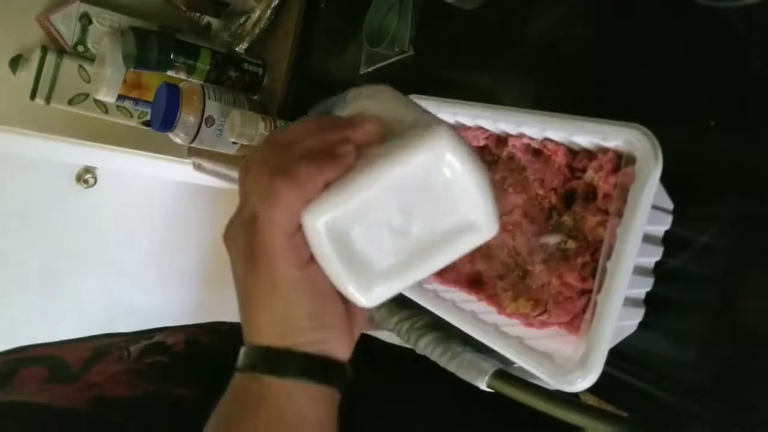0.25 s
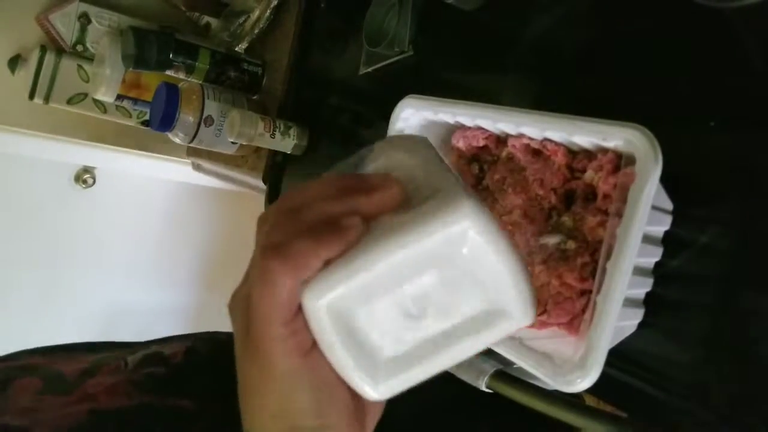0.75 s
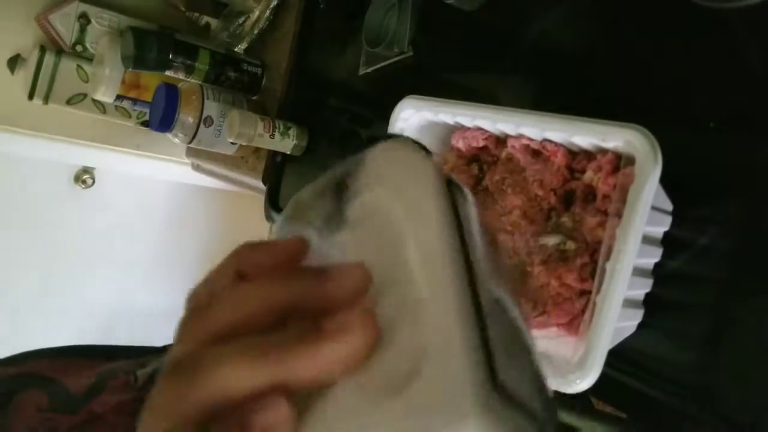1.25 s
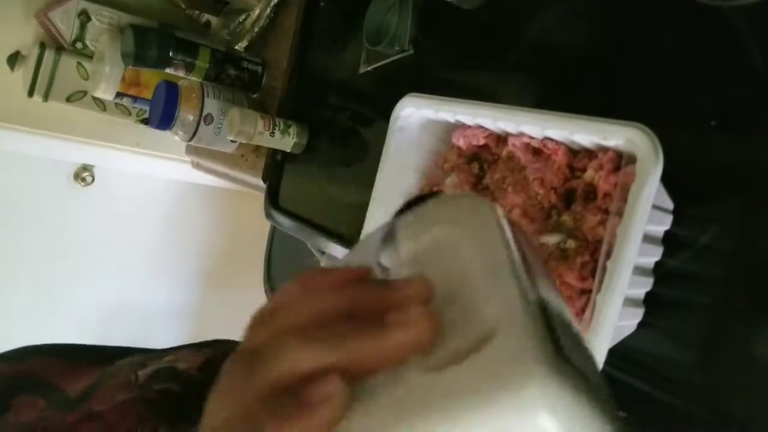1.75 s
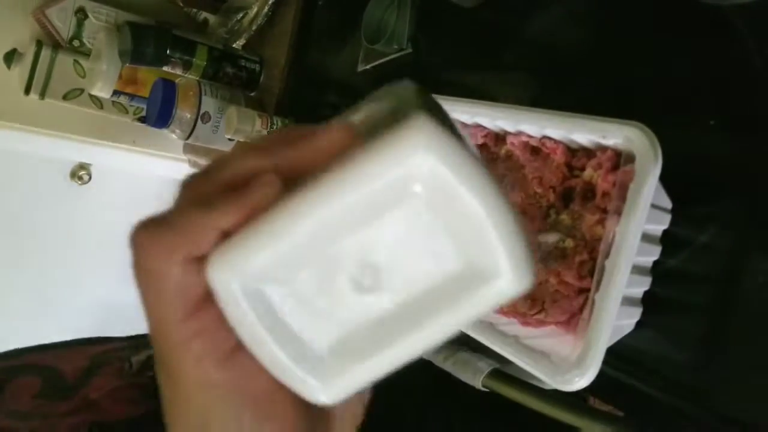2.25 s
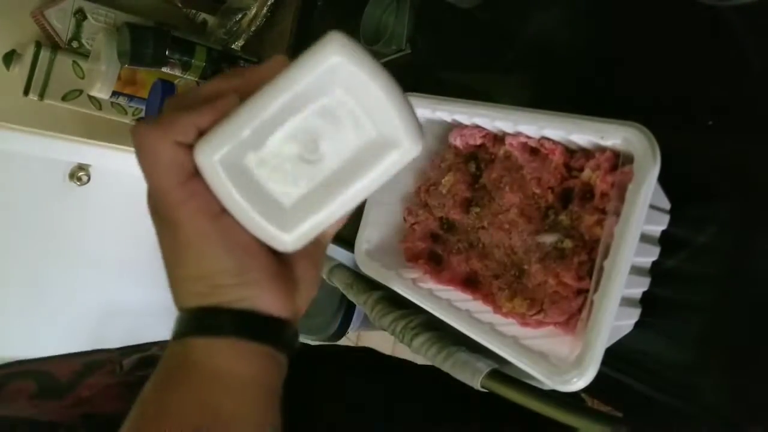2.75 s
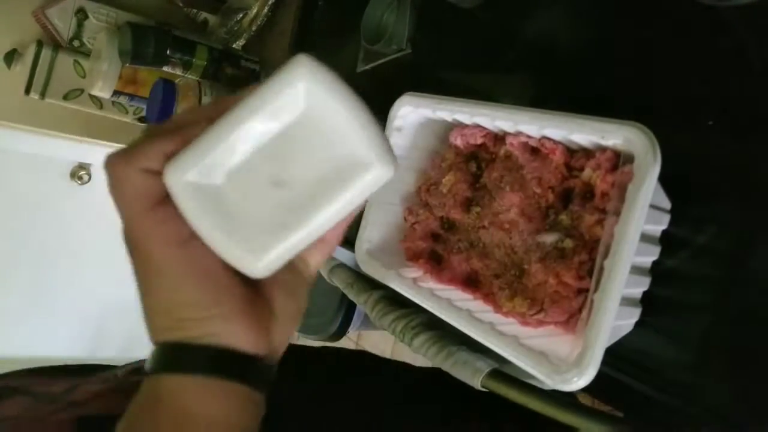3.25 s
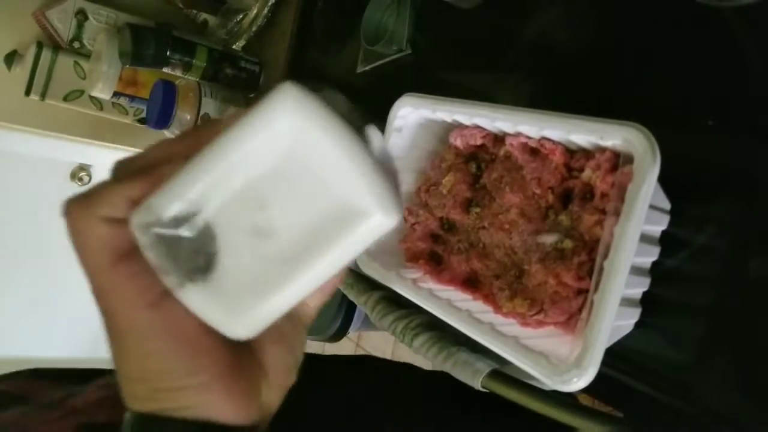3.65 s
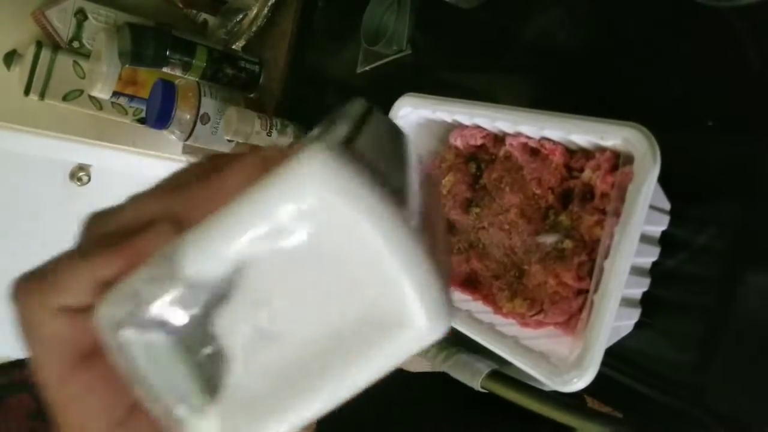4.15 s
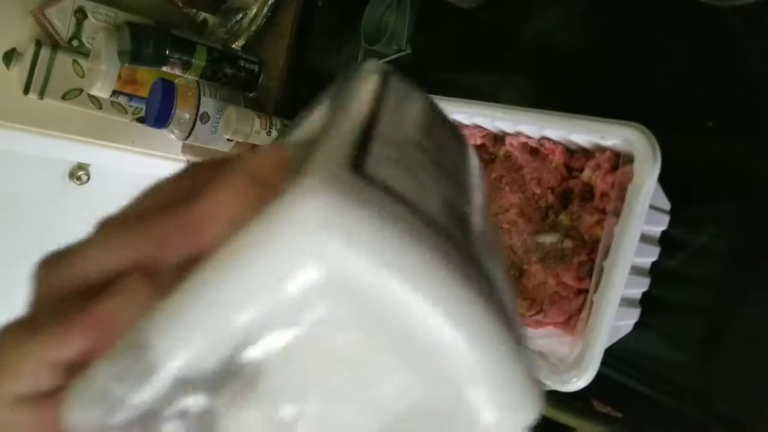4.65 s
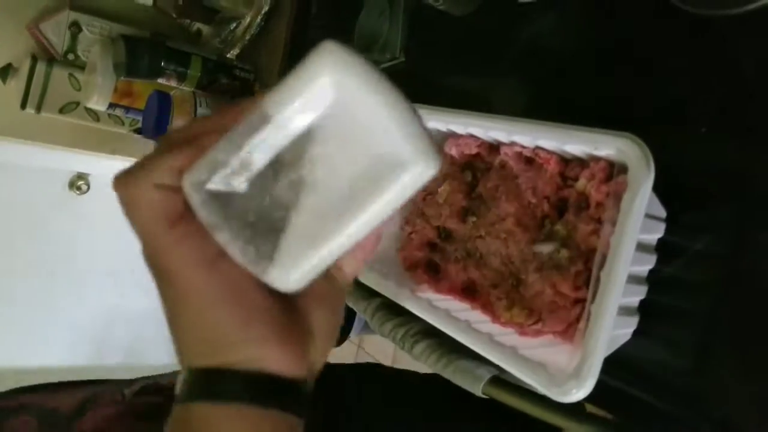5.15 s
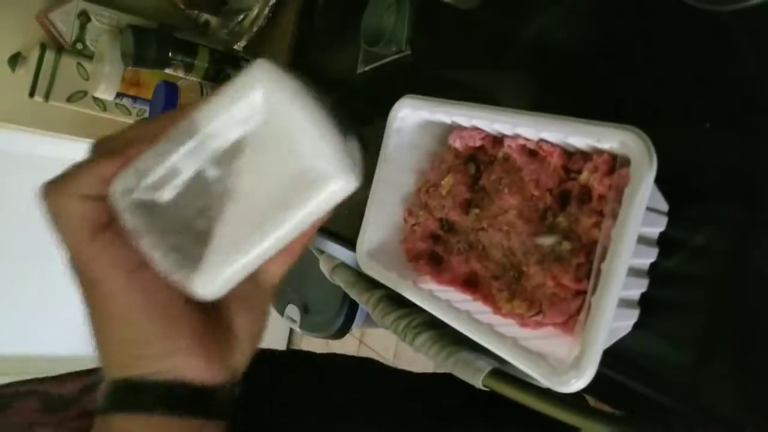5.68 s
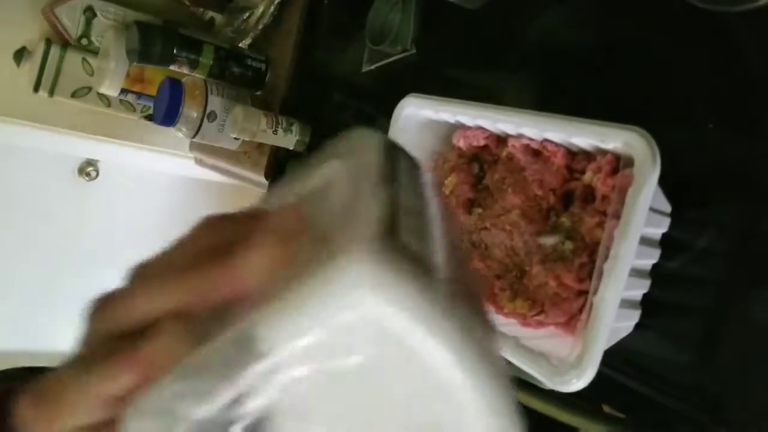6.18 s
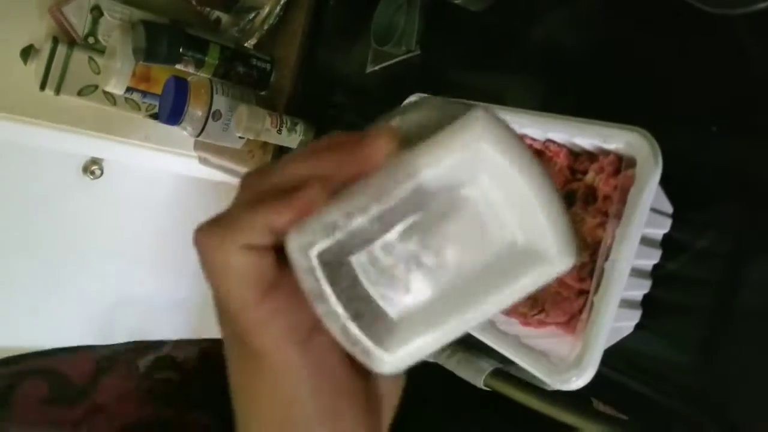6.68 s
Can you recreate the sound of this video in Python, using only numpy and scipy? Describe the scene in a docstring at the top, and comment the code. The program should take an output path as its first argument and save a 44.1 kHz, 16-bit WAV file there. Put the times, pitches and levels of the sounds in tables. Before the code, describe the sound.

Salt hisses and rattles in a hand-shaken plastic jar in uneven strokes, lumps knocking its wall harder later, over faint kitchen appliance hum.

```python
"""A plastic jar of salt is shaken in uneven strokes in a small kitchen.
Loose grains hiss as coloured random ticks; coarser grains scrape the wall and set its resonances ringing.
Lumps knock amid bursts of crumbs and throw off sprays; one brief puff of noise sounds around 3 kHz.
Soft handling bumps are low sine bursts, and a short noise-built room response surrounds the jar.
An appliance hums as wavering sines under the low rumble of the room, which is shaped noise."""
import sys
import numpy as np
from scipy import signal
from scipy.fft import rfft, irfft, next_fast_len
from scipy.io import wavfile
from scipy.ndimage import uniform_filter1d

SR = 44100
rng = np.random.default_rng(int(sys.argv[2]) if len(sys.argv) > 2 else 0)


def wrap_up_sound(samples):
    """Save the sound to the file named by the first command line argument, as 16-bit audio."""
    columns = np.atleast_2d(samples).T
    # keep every value between -1 and 1, then stretch to whole-number steps
    tamed = np.clip(columns, -1, 1)
    steps = np.round(tamed * 32767).astype(np.int16)
    wavfile.write(sys.argv[1], SR, steps)


N = 305039
TIME = np.arange(N) / SR
SIDES = np.array([[1], [-1]])  # left plus, right minus

# slides of the salt along the wall, levels before each layer's trim:
# start_s, rise_s [s], hold_s [s], hiss_db [dB], wall_ring_db [dB]
SLIDES = [(0.0, 0.0046, 0.14, -65, -72), (0.067, .07, 0.14, -60, -56), (0.311, 0.055, 0.047, -51.5, -51),
          (0.479, .02, 0.026, -54, -58), (0.56, 0.023, .1, -63.5, -70), (0.87, .01, 0.066, -74, -53.5),
          (0.973, 0.023, 0.048, -62, -70), (1.043, 0.031, 0.053, -60.5, -52.5),
          (1.378, 0.018, 0.094, -53.5, -55), (1.553, 0.018, 0.024, -59, -57),
          (1.748, 0.026, 0.11, -54.5, -49), (1.922, 0.038, 0.069, -64.5, -57),
          (2.072, 0.062, 0.056, -59, -52.5), (2.47, 0.066, .012, -61.5, -60),
          (2.565, 0.19, 0.074, -59.5, -60), (2.87, 0.055, 0.14, -56, -51.5), (3.233, 0.12, 0.02, -63, -64),
          (3.446, 0.068, 0.04, -59, -43.5), (3.635, 0.0057, .14, -55, -43.5), (3.853, .03, .08, -74, -57),
          (3.973, 0.06, 0.1, -55.5, -44), (4.293, 0.0045, 0.0082, -62.5, -56),
          (4.371, 0.03, 0.021, -54.5, -54), (4.424, 0.033, 0.029, -50.5, -48),
          (4.576, 0.018, 0.046, -69, -70), (4.738, 0.05, 0.081, -53, -44),
          (5.111, 0.042, 0.024, -58, -50.5), (5.456, 0.0038, 0.0055, -58, -59),
          (5.493, 0.02, 0.01, -58, -49), (5.535, 0.06, .012, -53, -46.5), (5.686, 0.018, 0.065, -61, -54),
          (5.725, 0.19, 0.066, -59.5, -48.5), (6.206, 0.026, .06, -53, -48),
          (6.282, 0.044, 0.012, -51, -54), (6.559, 0.029, 0.04, -55, -58),
          (6.647, 0.035, 0.052, -52.5, -43.5)]
# lumps hitting the jar, levels before each layer's trim: time_s, knock_db of the upper modes,
# thud_db of the middle modes, thump_db of the lowest modes, spray_db of grains, favoured_hz
LUMPS = [(0.2395, -48, -64, -63, -49.5, 487), (0.3458, -43, -59, -67, -62, 2360),
         (0.5066, -42, -64, -58, -46, 1760), (0.632, -47, -51.5, -49, -57, 890),
         (0.7307, -58, -57, -60, -58, 700), (1.0193, -47.5, -57, -42, -64, 1410),
         (1.074, -35.5, -51, -55, -50, 2310), (1.4265, -37, -46, -55, -55, 2220),
         (1.497, -40, -46, -63, -47.5, 2220), (1.9195, -50, -57, -51, -53, 649),
         (2.4059, -49.5, -53, -51, -63, 900), (2.854, -43, -52, -47, -69, 1370),
         (2.9077, -38, -65, -60, -60, 1950), (2.9262, -39, -62, -58, -62, 2200),
         (2.9552, -36, -47, -42, -48, 1800), (3.0103, -34, -49, -59, -54, 1920),
         (3.0544, -45, -45, -42, -62, 1950), (3.0833, -36, -36.5, -38, -68, 1440),
         (3.3583, -37.5, -65, -61, -57, 2230), (3.5229, -38.5, -72, -58, -52, 2000),
         (3.5497, -36, -64, -48, -68, 2030), (3.6393, -36.5, -67, -42, -50, 2320),
         (3.6991, -35.5, -44, -40, -55, 2210), (3.7487, -37, -34, -37, -55, 920),
         (4.049, -42, -32.5, -30.5, -52, 556), (4.1072, -54, -47, -42, -46.5, 493),
         (4.1236, -35.5, -40, -43, -50, 710), (4.1503, -45, -39, -57, -58, 1010),
         (4.2988, -45, -73, -62, -62, 2390), (4.3815, -63, -42, -50, -56, 620),
         (4.4165, -33.5, -36.5, -29.5, -45, 525), (4.4807, -33, -36, -43, -44, 740),
         (4.4923, -35, -37, -36.5, -46, 750), (4.5014, -32.5, -30.5, -56, -64, 1380),
         (4.7794, -30, -40, -49, -52, 2130), (4.849, -31, -34, -38, -45.5, 1110),
         (4.924, -61, -66, -56, -51.5, 1500), (5.1872, -36.5, -39, -40, -53, 2030),
         (5.266, -68, -72, -63, -59.5, 2300), (5.5217, -38, -44.5, -53, -59, 686),
         (5.6133, -32, -34, -42, -53, 940), (5.9685, -40, -49, -61, -56, 800),
         (6.2608, -39.5, -36.5, -67, -56, 750), (6.3501, -34, -33, -61, -43, 1000),
         (6.358, -30, -44, -65, -59, 2380), (6.6228, -43, -34.5, -39, -54, 850),
         (6.6454, -55, -42, -44, -54, 484), (6.6822, -42, -63, -61, -50, 2300),
         (6.7363, -36.5, -35, -53, -60, 1110), (6.7481, -34.5, -35, -48, -61, 1140),
         (6.7959, -36.5, -55, -57, -70, 2310)]
# modes of the hand-damped jar, which rings only a few cycles: pitch_hz, relative_db, t60_s
JAR_MODES = [(186, -7, 0.054), (302, -6, 0.07), (392, -0.5, 0.021), (484, -15.5, 0.11), (615, -0.5, 0.033),
             (757, -10.5, 0.13), (885, 10.5, 0.0088), (1110, 6.5, 0.014), (1370, 5, 0.0082),
             (1510, -3.5, 0.018), (1734, 4, 0.0088), (2030, 1.5, 0.023), (2310, 3, 0.016),
             (2710, 3.5, 0.011), (2942, 0, 0.01), (3230, -3, 0.014), (3850, 3.5, 0.0029)]


def from_db(db):
    """Decibels to gain."""
    return 10 ** (np.asarray(db) / 20)


def rms_one(x):
    """Scale to unit power."""
    return x / np.sqrt(np.mean(x ** 2) + 1e-20)


def in_time(rows):
    """A curve at every sample."""
    return np.interp(TIME, *np.transpose(rows))


def at_hz(points, hz):
    """Read a spectrum on a log-frequency axis."""
    freqs, values = np.transpose(points)
    return np.interp(np.log(hz + 1e-3), np.log(freqs), values)


def drift(rate):
    """Joined random points with spread 1, `rate` of them a second."""
    return np.interp(TIME * rate, np.arange(4000), rng.standard_normal(4000))


def colour(pair, spectrum, likeness):
    """Mix two unrelated signals into left and right of one spectrum; each side sums the power of both."""
    size = next_fast_len(N + 8192)
    hz = np.fft.rfftfreq(size, 1 / SR)
    mid, side = rfft(pair, size) * rms_one(from_db(at_hz(spectrum, hz)))
    alike = np.clip(at_hz(likeness, hz), -1, 1)
    stereo = np.sqrt(1 + alike) * mid + np.sqrt(1 - alike) * side * SIDES
    return irfft(stereo, size)[:, :N]


def lean(pair, balance):
    """Tip each frequency to the left or right."""
    size = next_fast_len(N)
    tip_db = at_hz(balance, np.fft.rfftfreq(size, 1 / SR))
    return irfft(rfft(pair, size) * from_db(tip_db / 2 * SIDES), size)[:, :N]


def ring(force, hz, t60):
    """A resonance: a unit click sets a decaying sine of height 1 ringing."""
    r = from_db(-60 / (t60 * SR))  # decay per sample
    w = 2 * np.pi * hz / SR
    return signal.lfilter([0, np.sin(w)], [1, -2 * r * np.cos(w), r * r], force + 1e-18)


def ticks(per_s, spread_db):
    """Grain impacts at random instants, random in size and sign; unit power."""
    sizes = from_db(spread_db * np.minimum(rng.exponential(1, N), 4)) * rng.choice([-1, 1], N)
    hits = rng.random(N) < per_s / SR
    return rms_one(sizes * hits / np.sqrt(per_s))  # density alone leaves the power even


def loose_salt(hiss_db=2.0, spray_db=2.0, per_s=7000, clump_db=2.0):
    """Grains tick on the wall in clumps, denser as the flow grows; each lump throws off a spray."""
    # colour of the grain ticks: pitch_hz, relative density [dB per Hz]
    grain_colour = [(300, 6.5), (700, -4.5), (1000, 1.5), (1500, 3), (2600, 3.5), (4000, 0.5), (5500, -1),
                    (7700, -0.5), (10000, -3.5), (12500, 0.5), (15500, -5.5)]
    # likeness of left and right: pitch_hz, correlation [-1..1]
    grain_likeness = [(500, 1), (1400, 0.13), (2800, 0.12), (6000, 0.037), (14000, 0.092)]
    # lean of the hiss: pitch_hz, left minus right [dB]
    grain_lean = [(700, -1), (5500, -1.5), (9000, 1), (14000, -3)]
    spray_s = .0095  # amplitude falls to 1/e in this time
    levels_db = [row[3] for row in SLIDES]
    flow = from_db(hiss_db) * sliding(levels_db, fall_db_per_s=181.5, trickle_db=-78, packing_db=0)
    power = (flow * from_db(clump_db * drift(160))) ** 2
    for s, knock, thud, thump, spray, favoured_hz in LUMPS:
        start = int(s * SR)
        after = TIME[start:][:4096] - s
        power[start:][:4096] += from_db(spray + spray_db) ** 2 * np.exp(-2 * after / spray_s)
    rate = per_s * np.sqrt(rms_one(flow))
    pair = np.array([ticks(rate, spread_db=2.0) for side in range(2)]) * np.sqrt(power)
    return lean(colour(pair, grain_colour, grain_likeness), grain_lean)


def sliding(levels_db, fall_db_per_s, trickle_db, packing_db):
    """Strength of the moving salt: each slide swells, holds and settles, over a faint steady trickle."""
    swell_db = 15.0  # gained during the rise
    power = np.full(N, from_db(trickle_db) ** 2)
    for (start_s, rise, hold, *_), db in zip(SLIDES, levels_db):
        start = int(start_s * SR)
        after = TIME[start:][:SR] - start_s
        swell = swell_db * np.minimum(after / rise - 1, 0)
        piling = packing_db * (np.minimum(after / (rise + hold), 1) - 1)
        settling = fall_db_per_s * np.maximum(after - rise - hold, 0)
        power[start:][:SR] += from_db(db + swell + piling - settling) ** 2
    return np.sqrt(power)


def sparkle(pair, edge_hz=10000):
    """The treble of the finest grains rises and falls as the jar turns."""
    # treble lift over time: time_s, lift_db
    treble_lift = [(0, 2.5), (2.0, -1), (3.05, -0.5), (3.6, -8), (4.4, -2.5), (5.1, -3), (5.8, 1),
                   (6.9, -2.5)]
    top = signal.sosfiltfilt(signal.butter(2, edge_hz, "high", fs=SR, output="sos"), pair)
    return pair + top * (from_db(in_time(treble_lift)) - 1)


def wall(level_db=-5.0, low_modes_db=-2.5, per_s=1000, surge_db=3.5, stray=0.75):
    """Coarse grains scrape in clumps and ring the middle and upper modes, pressing harder as salt piles up."""
    levels_db = [row[4] for row in SLIDES]
    press = sliding(levels_db, fall_db_per_s=186, trickle_db=-77.0, packing_db=4.5)
    surge = from_db(surge_db * drift(90))
    shared, opposed = ticks(per_s, spread_db=-0.6), ticks(per_s, spread_db=2.1)
    force = (shared + stray * opposed * SIDES) * surge
    rings = np.zeros((2, N))
    for k, (hz, db, t60) in enumerate(JAR_MODES):
        if hz > 550:
            gain = from_db(db + low_modes_db * (hz < 1500))
            rings += (-1) ** k * gain * ring(force, hz, t60)  # neighbours in opposite phase
    return from_db(level_db) * press * rms_one(rings)


def lumps(knock_db=-4.5, thud_db=-2.5, thump_db=-6.5, crumbs_per_s=2600, crumb_size=0.67):
    """A lump lands with one blow amid its crumbs, ringing low, middle and upper modes at separate levels."""
    ahead = 256  # samples of crumbs before the blow
    lead_s, crumbling_s = 0.0028, 0.0054  # 1/e times of the crumbs before and after the blow
    favour_db = 7.0  # peak boost of the favoured pitch
    out, after = np.zeros((2, N + 4096)), TIME[:4096] - ahead / SR
    crumbling = np.exp(np.minimum(after / lead_s, -after / crumbling_s))
    mode_hz = np.array(JAR_MODES)[:, 0]
    family = np.digitize(mode_hz, [550, 1470])  # 0 thump, 1 thud, 2 knock
    for s, knock, thud, thump, spray, favoured_hz in LUMPS:
        hits = rng.random(4096) < crumbs_per_s / SR
        force = crumb_size * rng.standard_normal(4096) * hits * crumbling
        force[ahead] = 1
        # each spot on the wall favours the modes near one pitch
        octaves_off = np.log2(mode_hz / favoured_hz)
        favour = from_db(favour_db * np.exp(-(octaves_off / 0.32) ** 2))
        rings = modes(force, detune=0.02, vary_db=0.4, stray=0.5) * favour[:, None, None]
        levels_db = (thump + thump_db, thud + thud_db, knock + knock_db)
        for k, level_db in enumerate(levels_db):
            blow = rings[family == k].sum(axis=0)
            # the level sets the loudest short-time rms of the family
            loudest = np.sqrt(uniform_filter1d(np.mean(blow ** 2, axis=0), size=256).max())
            out[:, int(s * SR) - ahead:][:, :4096] += from_db(level_db) * blow / loudest
    return out[:, :N]


def modes(force, detune, vary_db, stray):
    """The jar's modes in stereo; grip and spot of contact change pitch, strength and direction of each."""
    out = []
    for hz, db, t60 in JAR_MODES:
        pitch, strength, side, turn = rng.standard_normal(4)
        gain = rng.choice([-1, 1]) * from_db(db + vary_db * strength)
        note = gain * ring(force, hz * (1 + detune * pitch), t60)
        quarter_cycle_on = np.gradient(note) * SR / (2 * np.pi * hz)
        # the short waves of the upper modes differ most between the microphones
        spread = stray * np.sqrt(hz / JAR_MODES[-1][0])
        out.append(note + spread * (side * note + turn * quarter_cycle_on) * SIDES)
    return np.array(out)


def narrow_puff():
    """A brief puff of narrow-band noise around 3 kHz under a bell-shaped swell."""
    centre_s, length_s, level_db = 5.436, .013, -49.0
    pitch_hz, width_hz = 3250, 1300
    edges_hz = [pitch_hz - width_hz / 2, pitch_hz + width_hz / 2]
    band = signal.butter(3, edges_hz, "band", fs=SR, output="sos")
    swell = np.exp(-(2 * (TIME - centre_s) / length_s) ** 2)
    return from_db(level_db) * swell * rms_one(signal.sosfilt(band, rng.standard_normal(N)))


def handling(length_s=0.014):
    """Soft, low sine bumps that swell and die within a few cycles, alike in both channels."""
    # dull bumps of handling: start_s, peak level_db, pitch_hz
    bumps = [(.51, -42, 65), (3.605, -37.5, 59.7), (4.26, -42.5, 127.7), (6.549, -40, 65.7),
             (6.722, -48, 98)]
    out, after = np.zeros(N + 8192), TIME[:8192]
    swell = after / length_s * np.exp(1 - after / length_s)  # peaks at length_s
    for s, db, hz in bumps:
        out[int(s * SR):][:8192] += from_db(db) * swell * np.sin(2 * np.pi * hz * after)
    return out[:N]


def kitchen(pair, early_db=-6.5, early_s=0.0097, tail_db=-10.5, tail_t60_s=0.39):
    """Counter and cupboards answer within milliseconds, then a short tail follows, different at each side."""
    after = TIME[:SR // 2]
    onset = 1 - np.exp(-(after / 0.0049) ** 2)
    early, tail = rng.standard_normal((2, 2, len(after))) * onset
    early = rms_one(early * np.exp(-after / early_s))
    tail = rms_one(tail * from_db(-60 * after / tail_t60_s))
    response = (from_db(early_db) * early + from_db(tail_db) * tail) / np.sqrt(len(after))
    return pair + signal.fftconvolve(pair, response, axes=1)[:, :N]


def background(room_gain_db=-50.5, waver_db=-3.5, wander=0.31):
    """Room rumble of shaped noise, and appliance hum of sines drifting in level and phase."""
    # rumble of the room: pitch_hz, relative density [dB per Hz]
    room_colour = [(20, -6), (35, -7.5), (58, 3.5), (85, -2.5), (140, -3.5), (200, -7), (320, -7),
                   (420, -14), (700, -19), (900, -22), (1300, -27.5), (2850, -33), (3250, -38),
                   (15000, -48)]
    # likeness of left and right: pitch_hz, correlation [-1..1]
    room_likeness = [(40, 0.95), (90, 1), (180, 0.89), (350, 0.58), (700, 0.51), (1400, 0), (4000, 0.076)]
    # appliance hum: pitch_hz, level_db [dB rms before the waver]
    hum_tones = [(118.4, -57.5), (262, -66), (312, -75), (360.4, -60.5)]
    rumble = from_db(room_gain_db) * colour(rng.standard_normal((2, N)), room_colour, room_likeness)
    hum = np.zeros(N)
    for hz, db in hum_tones:
        height = np.sqrt(2) * from_db(db + waver_db * drift(3.78))
        hum += height * np.sin(2 * np.pi * hz * TIME + wander * drift(5))  # wander in radians
    return rumble + hum


def scene():
    """The jar is close to the microphones, a little nearer the left one, over handling and background."""
    right_lag_s = .00016
    knocks_and_scrapes = wall() + lumps() + narrow_puff()
    left, right = sparkle(loose_salt()) + knocks_and_scrapes * from_db(0.6 * SIDES)
    right = np.concatenate([np.zeros(round(right_lag_s * SR)), right])[:N]
    return kitchen(np.array([left, right])) + handling() + background()


def record(dry, cutoff_hz=15600):
    """The top is cut steeply by an elliptic low-pass."""
    return signal.sosfilt(signal.ellip(12, .1, 80, cutoff_hz, fs=SR, output="sos"), dry)


dry = scene()
out = record(dry)
wrap_up_sound(out)
```